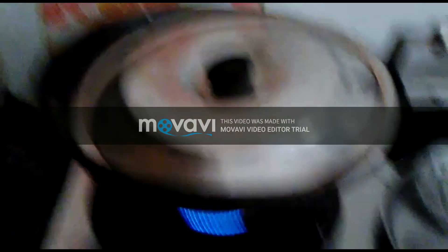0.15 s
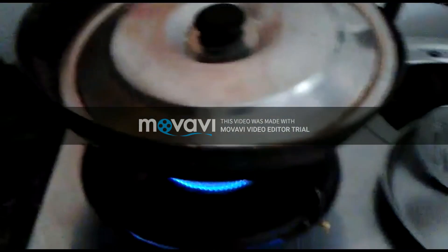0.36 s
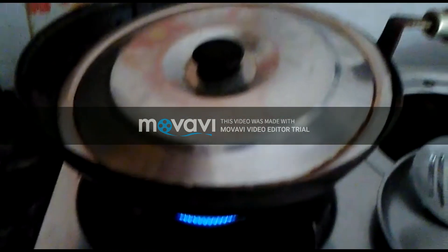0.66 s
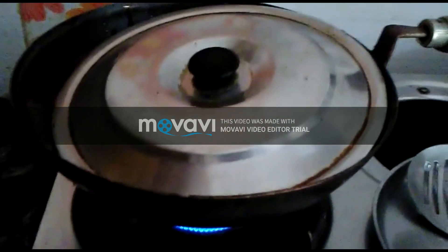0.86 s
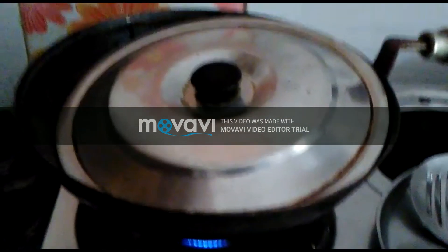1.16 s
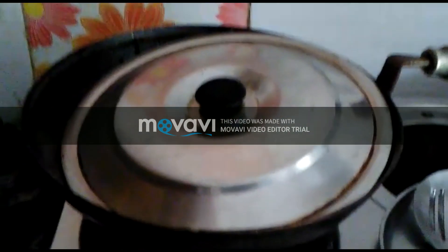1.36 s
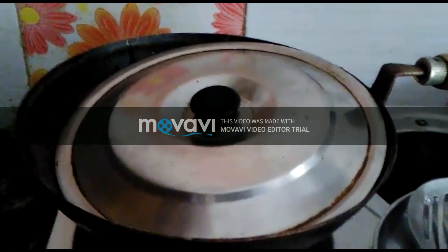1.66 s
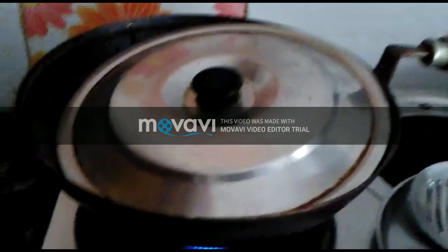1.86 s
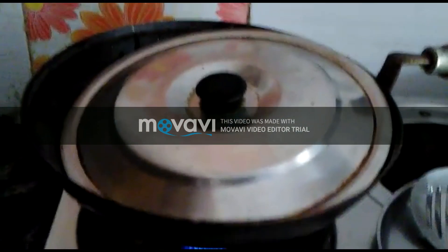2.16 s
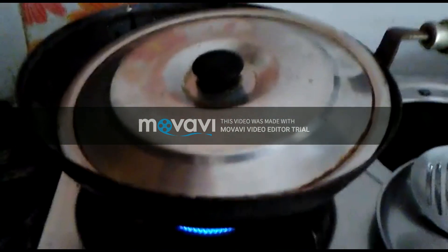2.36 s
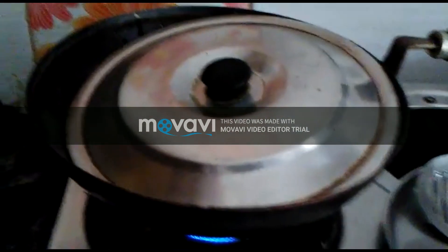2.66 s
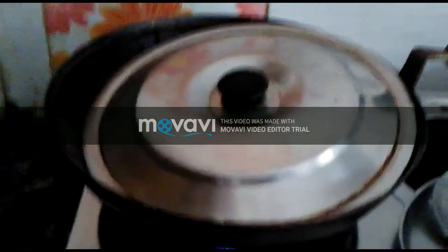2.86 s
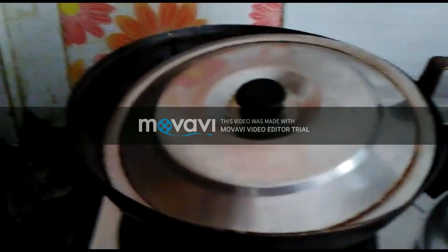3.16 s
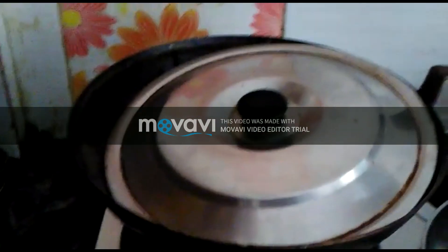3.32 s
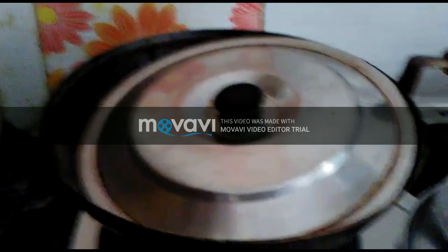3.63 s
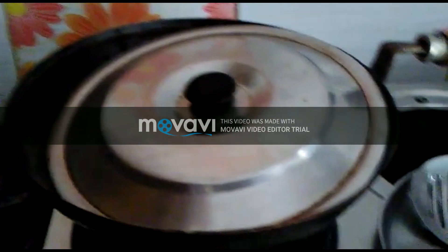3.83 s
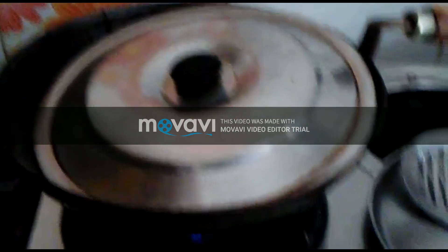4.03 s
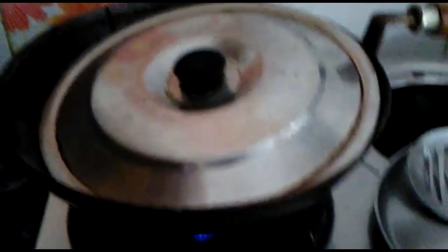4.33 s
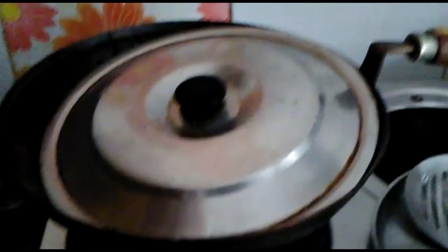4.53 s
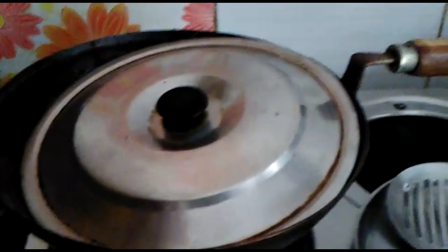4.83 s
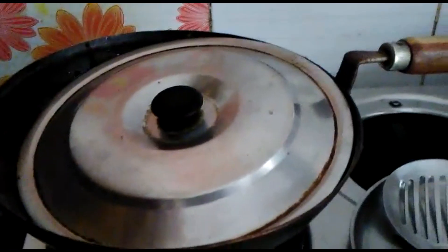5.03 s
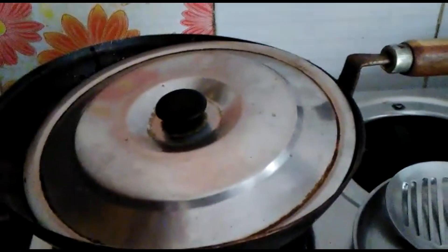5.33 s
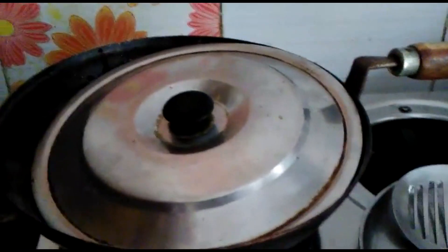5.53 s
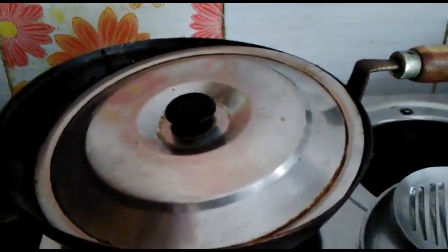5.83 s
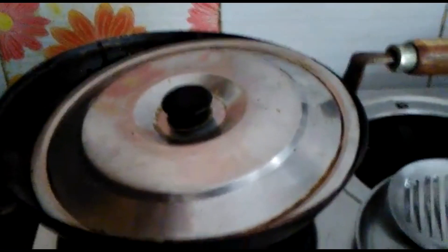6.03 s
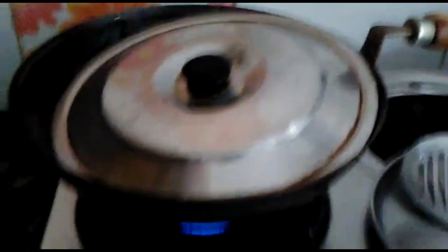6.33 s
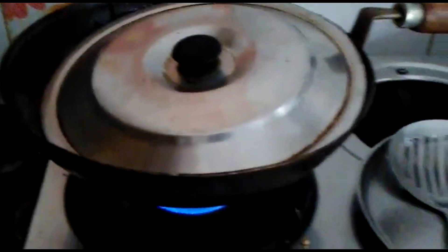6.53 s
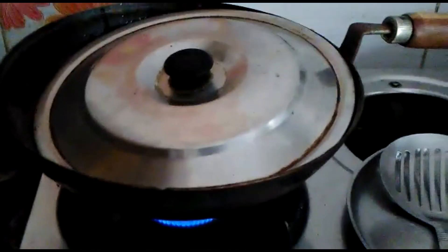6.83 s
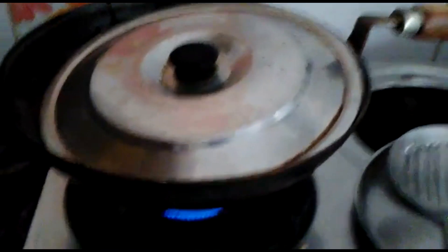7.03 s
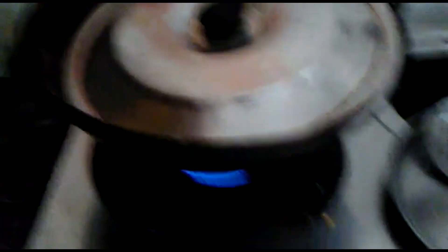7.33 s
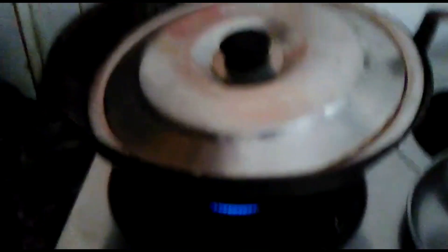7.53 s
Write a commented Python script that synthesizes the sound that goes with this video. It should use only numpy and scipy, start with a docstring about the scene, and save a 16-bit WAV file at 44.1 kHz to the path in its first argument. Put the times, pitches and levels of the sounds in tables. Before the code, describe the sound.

Close beside a covered pan on a kitchen gas stove, peas fry in oil. A soft, grainy simmer and airy high hiss continue throughout above a faint low flame rumble. Small spits tick with tiny metallic notes, mixed with brief fizzes. A mild pop opens the scene; faint short hums and light splashes appear around 0.7-0.8 seconds. At 1.48 and 1.57 two hard bursts thump and crack, the lid clanging at 1.61, with a weaker hollow knock at 1.87. Low hums flick by near 2.2 amid quieter spitting. The strongest, sharp burst hits around 3.58, after a small precursor; another rings at 4.75 with a quick double clang. At 5.78 a full thump and bright spit lead to two lid taps by 5.84. Hiss briefly swells after strong blows. From 6 to 7.7 only sizzling, fizzes and small spits remain. Treble is weaker on the left.

```python
"""At a gas stove, dried peas fry in oil under a thin steel lid. Steam bubbles spit: each is a short note that also
rings the pan. Now and then a pea bursts with a thump and a crack, and the lid lands on the rim with a clang; both
ring the modes of the lid, with noise around them. Short low hums, fizzes and splashes come between.
Behind them lie shaped noises: simmering and hissing oil, and the rumble of the gas flame.
The left microphone port is shaded and hears little treble."""
import sys
import numpy as np
from scipy import signal
from scipy.fft import rfft, irfft, next_fast_len
from scipy.io import wavfile
from scipy.ndimage import uniform_filter1d, map_coordinates

SR = 44100
rng = np.random.default_rng(int(sys.argv[2]) if len(sys.argv) > 2 else 0)


def wav_out(sig):
    """Save sig, one row per channel (or a flat mono array), as 16-bit PCM at SR to the path in sys.argv[1]."""
    wavfile.write(sys.argv[1], SR, np.round(np.clip(np.atleast_2d(sig).T, -1, 1) * 32767).astype(np.int16))


N = 338688

# bursting peas: t/s, blow level/dB, lows below the hinge/dB, brightness above it/(dB per octave),
# modes near the knock/dB
BURSTS = [(0.05, -35.5, -8.5, -2, -10), (1.482, -19.5, -4.5, 0, -7), (1.573, -13.5, -3, 0.43, 5),
          (1.866, -23.5, -3, -1.5, 10.5), (3.554, -25.5, 2.5, 2.9, 0), (3.585, -10.5, -4.5, 1, -2),
          (4.309, -49.5, -32, 3, -4), (4.754, -12, -2, 1.1, -3), (5.777, -15.5, 1.5, 0.1, -1),
          (7.243, -45, -26, -3.5, -7), (7.647, -50.5, -6, 0, 0.5)]
# ringing modes of the lid and the air under it: f/Hz, relative level/dB, time to fall 60 dB/s
LID_MODES = [(84, -14, 0.58), (106.2, 2.5, 0.46), (129.1, -5.5, .3), (250, -4, 0.14), (303.6, -9, 0.31),
             (328, -2, 0.21), (368.5, -5.5, 0.22), (440.7, -0.5, 0.21), (490, -2, 0.29), (637, -2, .2),
             (782, -4.5, 0.044), (832, -5, 0.18), (1200, -3, 0.18), (1380, -10.5, 0.12), (1550, -18, 0.18),
             (1792, -2, 0.29), (1922, -7.5, 0.42), (1978, -9, 0.48), (3120, -12.5, 0.059), (3490, -7, 0.16),
             (3600, -3, 0.2), (4190, -6.5, 0.18), (3920, -6.5, 0.33), (4750, -14, 0.29), (5280, -6, .2),
             (5500, -3, 0.22), (5520, -5, 0.16), (6210, -0.5, 0.13), (7160, -3.5, 0.07),
             (8650, -0.5, 0.069)]
# how alike left and right are: f/Hz, likeness (1 = the same, 0 = unrelated)
LIKENESS = [(60, 0.86), (140, 0.57), (320, 0.68), (750, 0.42), (1730, 0.02), (4010, 0.01), (9280, 0.1)]
KNOCK_HZ, CLANG_HZ = 800, 1850  # the colour point that is set anew for each burst, and for each landing


def bursting_peas():
    """A bursting pea thumps the lid, which rings mostly low and flexes back; the pea's skin cracks."""
    # shared colour of the bursts: f/Hz, level/dB before each burst's own tone
    burst_colour = [(105, 0), (298, 0), (480, -12), (KNOCK_HZ, -10), (1400, -18.5), (5600, -21)]
    # how fast the air puff of a burst dies away: f/Hz, time to fall 60 dB/s
    puff_fading = [(70, 0.47), (300, 0.33), (1000, 0.31), (2000, 0.38), (9000, .07)]
    hinge_hz, flex_hz, flex_delay_s = 299, 270, 0.0128
    crack_db, crack_t60_s = -24, 0.012  # the crack starts this far from the blow level, and dies this fast
    out, t = np.zeros((2, N + SR)), np.arange(SR // 30) / SR
    late = t - flex_delay_s
    flex = np.exp(-(late / 0.003) ** 2) * np.cos(2 * np.pi * flex_hz * late) * np.ones((2, 1))
    for s, db, *tone in BURSTS:
        colour = tinted(burst_colour, hinge_hz, KNOCK_HZ, *tone)
        thump = struck(LID_MODES[:14], colour, puff_fading, rise_s=0.0017, punch=1.1, spray_db=10.5, chatter=0.21)
        crack = amp(crack_db - 60 * t / crack_t60_s) * rng.standard_normal((2, len(t)))
        add(out, s, amp(db) * thump)
        add(out, s, -amp(db - 0.5) * flex)
        add(out, s, amp(db) * crack)
    return out[:, :N]


def landing_lid():
    """The lid lands on the rim and rings its higher modes."""
    # landings: t/s, blow level/dB, lows below the hinge/dB, brightness above it/(dB per octave),
    # modes near the clang/dB
    landings = [(1.611, -22, -9.5, -2.5, 5.5), (1.955, -57.5, -9, 14, 0), (3.6117, -34.5, -4, 3.5, 0),
                (4.782, -21.5, 4.5, 4, -3), (4.7992, -25, 5.5, -4.9, -0.5), (5.8196, -28, 5.5, -0.2, -0.5),
                (5.8441, -25, 2.5, -2.5, 1)]
    # shared colour of the landings: f/Hz, level/dB before each landing's own tone
    landing_colour = [(500, -63.5), (847, -2), (1200, -0.92), (CLANG_HZ, 0), (3740, -3), (5700, -9.5),
                      (9200, -12.5)]
    # how fast thrown oil and the room die away: f/Hz, time to fall 60 dB/s
    spray_fading = [(70, .4), (300, 0.86), (1000, 0.33), (4000, 0.37), (9000, 0.35)]
    hinge_hz = 1700
    out = np.zeros((2, N + SR))
    for s, db, *tone in landings:
        colour = tinted(landing_colour, hinge_hz, CLANG_HZ, *tone)
        clang = struck(LID_MODES[10:], colour, spray_fading, rise_s=0.0025, punch=0.1, spray_db=9.5, chatter=0.09)
        add(out, s, amp(db) * clang)
    return out[:, :N]


def struck(modes, colour, fading, rise_s, punch, spray_db, chatter):
    """Lid modes ring with the colour of the blow; noise crowds round them and dies band by band."""
    t = np.arange(SR * 2 // 3) / SR
    hz, db, t60 = np.transpose(modes)[:, :, None]
    chance = rng.standard_normal((2, len(modes), 1))
    level = amp(db + along(colour, hz) + 1.8 * chance[0] - 60 * t / t60)
    level *= 1 + punch * amp(-60 * t / 0.03)  # the lid is loudest at first, while it is off the rim

    # a loose lid blurs its high modes: their phases wander
    knots = rng.standard_normal((len(modes), 200)).cumsum(1)
    wander = np.array([np.interp(t, np.arange(200) * 0.004, k - k[0]) for k in knots])
    phase = 2 * np.pi * hz * t + chatter * np.sqrt(hz / 1000) * wander

    # the microphone ports disagree on short waves
    likeness = np.clip(along(LIKENESS, hz) ** 2 * 3.3, 0, 1)
    lead = np.arccos(likeness) / 2 * np.sign(chance[1])
    ring = np.array([-(level * np.sin(phase + side * lead)).sum(0) for side in (1, -1)])

    # noise with a hump of power round every lid mode
    f, frames, z = signal.stft(rng.standard_normal((2, len(t))), SR, nperseg=256, noverlap=192)
    humps = sum(amp(2 * d) / (1 + ((f - c) / (0.033 * c + 40)) ** 4) for c, d, _ in LID_MODES)
    crowd = np.sqrt(humps + 0.051)[:, None]
    decay_db = -60 * frames / along(fading, f)[:, None]
    z = paired(z, f) * crowd * amp(along(colour, f)[:, None] + spray_db + decay_db)
    spray = signal.istft(z, SR, nperseg=256, noverlap=192)[1][:, :len(t)]
    return (ring + spray) * (1 - np.exp(-t / rise_s))


def tinted(colour, hinge_hz, accent_hz, low_db, tilt_db, accent_db):
    """The shared colour of a kind of blow, with the lows, brightness and accent of one blow."""
    points = []
    for hz, db in colour:
        tone_db = low_db if hz < hinge_hz else tilt_db * np.log2(hz / hinge_hz)
        points.append((hz, db + tone_db + accent_db * (hz == accent_hz)))
    return points


def humming_lid():
    """Short low gliding hums, as of the lid rocking: driven unevenly, then ringing out."""
    # hums: t/s, driven length/s, start f/Hz, end f/Hz, relative level/dB
    hums = [(0.708, 0.098, 269, 241, -50), (0.725, 0.056, 490, 486, -40.5), (0.777, 0.062, 318, 348, -48),
            (2.199, 0.038, 431, 490, -36), (2.238, 0.034, 454, 446, -45.5)]
    out, t = np.zeros((2, N + SR)), np.arange(SR // 3) / SR
    for s, length, start_hz, end_hz, db in hums:
        pitch = np.interp(t, [0, length], [start_hz, end_hz])
        uneven = amp(3.6 * np.interp(t, np.arange(40) * 0.0105, rng.standard_normal(40)))
        ring_out = amp(-60 * np.maximum(t - length, 0) / 0.065)
        shape = uneven * (1 - np.exp(-t / 0.0021)) * ring_out
        add(out, s, amp(db) * shape * np.sin(2 * np.pi * np.cumsum(pitch) / SR) * np.ones((2, 1)))
    return out[:, :N]


def pan():
    """Close pairs of pan modes, struck by single spits and by a patter that follows the simmer; spits also sing."""
    # pan mode pairs: f/Hz, second f/Hz, time to fall 60 dB/s, left lead/rad,
    # relative patter level/dB, answer to a spit/dB
    mode_pairs = [(330.3, 372, 0.13, 0.35, -6.5, -3), (1397.7, 1445, 0.099, -1.5, -2, 0),
                  (2341, 2375, .14, -1.07, -4.5, -1), (3189, 3215, 0.11, -1.5, -11.5, -2.5),
                  (4074, 4010, 0.19, 5, -12, -12)]
    # single spits, each a bubble with a note that strikes the pan; the rows at the burst times are the bursting
    # peas striking the pan, with a short note where it rings most: t/s, note f/Hz, relative level/dB
    spits = [(0.0201, 1300, -32), (0.1344, 2680, -35.5), (0.3543, 2350, -36.5), (0.37, 1810, -41),
             (0.498, 1280, -28), (0.6845, 2350, -39), (0.833, 2390, -36.5), (0.942, 3600, -43),
             (1.1136, 2820, -39.5), (1.1883, 1690, -35), (1.4101, 1420, -32.5), (1.483, 2780, -30.5),
             (1.543, 3500, -43), (1.574, 2850, -31), (1.8682, 1390, -33.5), (2.092, 1140, -39.5),
             (2.169, 3200, -44.5), (2.2822, 2310, -40.5), (2.3144, 1420, -39.5), (2.5755, 2880, -37),
             (2.682, 2320, -40), (2.7703, 1414, -41), (2.8893, 2380, -36.5), (2.9226, 2370, -34.5),
             (2.991, 3140, -35.5), (3.043, 1900, -32), (3.094, 2380, -42.5), (3.2227, 1300, -33.5),
             (3.4311, 2070, -39.5), (3.5533, 1480, -28.5), (3.586, 1440, -26), (3.9853, 2400, -39.5),
             (4.16, 1700, -39.5), (4.171, 2300, -42), (4.312, 1264, -32), (4.4163, 1520, -40.5),
             (4.494, 1300, -38.5), (4.7549, 1420, -27.5), (4.916, 1300, -38), (5.483, 3200, -44),
             (5.589, 1700, -33.5), (5.6132, 1430, -39), (5.69, 2300, -40), (5.7798, 1447, -19),
             (6.2682, 2300, -43.5), (6.5049, 2380, -45), (6.6237, 2280, -41.5), (6.6661, 2300, -42.5),
             (6.785, 2330, -43), (6.799, 1430, -28), (6.9167, 1490, -37), (6.999, 2300, -37),
             (7.042, 1090, -39.5), (7.1038, 1580, -35), (7.3112, 2350, -37.5), (7.3571, 2200, -38),
             (7.5083, 1420, -37), (7.5756, 1335, -31), (7.651, 1395, -38.5)]
    detune_db_per_octave = 23.5  # a spit strikes hardest the pan pair nearest to its note
    patter_per_s, clump_s, clump_db = 160, 0.12, 4  # the patter comes and goes in clumps
    out, t = np.zeros((2, N + SR)), np.arange(SR // 4) / SR
    short = t[:SR // 16]
    busy = np.pad(flow(column=1), ((0, 0), (0, SR)))
    for hz, second_hz, t60, lead, patter_db, answer_db in mode_pairs:
        phase = np.array([[lead / 2], [-lead / 2]])
        tones = np.sin(2 * np.pi * hz * t + phase) + 0.86 * np.sin(2 * np.pi * second_hz * t + phase)
        ring = amp(-60 * t / t60) * tones * (1 - np.exp(-t / 0.0016))

        hits = rng.random(N + SR) < patter_per_s / SR
        patter = hits * amp(3.45 * rng.exponential(1, N + SR)) * rng.choice([-1, 1], N + SR)
        clumps = map_coordinates(rng.standard_normal(100), [np.arange(N + SR) / SR / clump_s])
        blows = amp(patter_db - 11 + clump_db * clumps) * busy * patter

        for s, note_hz, db in spits:  # a first blow, then a short sputter
            sputter = 0.03 * amp(-60 * short / 0.093) * rng.standard_normal(len(short))
            detune_db = detune_db_per_octave * abs(np.log2(note_hz / hz))
            add(blows, s, amp(db + answer_db - detune_db) * ((short == 0) + sputter)[None])
        out += signal.fftconvolve(blows, ring, axes=1)[:, :N + SR]

    for s, hz, db in spits:  # the bubble's own note: higher notes die sooner
        phase = 2 * np.pi * hz * short + rng.uniform(0, 2 * np.pi, (2, 1))
        fade = amp(db + 6 - 60 * short * hz / 35)
        add(out, s, fade * (1 - np.exp(-short / 0.0012)) * np.sin(phase))
    return out[:, :N]


def fizz():
    """A crowd of tiny bubbles boils up at once: grainy noise about an octave wide, fading."""
    # sudden fizzes: t/s, level before the fade/dB, centre f/Hz
    fizzes = [(0.048, -45.5, 3130), (.4, -40.5, 1400), (.83, -46.5, 2980), (.9, -51.5, 1070),
              (1.189, -44, 1700), (2.57, -47.5, 1280), (2.83, -48, 1400), (3.048, -53, 1740),
              (3.433, -47, 1150), (3.487, -42, 1380), (4.33, -48, 1280), (5.38, -48, 3300),
              (5.481, -51, 1550), (6.33, -53, 1100), (6.491, -47.5, 1580), (6.82, -46, 1220),
              (7.3, -56.5, 3040), (7.475, -49, 1820)]
    t60_s = 0.43
    out, t = np.zeros((2, N + SR)), np.arange(SR // 3) / SR
    hz = np.fft.rfftfreq(len(t), 1 / SR)
    for s, db, centre_hz in fizzes:
        grain_gain = amp(3.0 * np.repeat(rng.standard_normal(len(t) // 100), 100))
        grains = rng.standard_normal((2, len(t))) * grain_gain
        hump = np.exp(-(np.log((hz + 1) / centre_hz) / 0.5) ** 2)
        band = irfft(rfft(grains) * hump, len(t))
        add(out, s, amp(db - 60 * t / t60_s) * (1 - np.exp(-t / 0.003)) * unit(band))
    return out[:, :N]


def oil_and_flame():
    """Noise of simmering, hissing oil and a rumbling flame; hiss and rumble swell after each burst."""
    # colour of the simmer: f/Hz, relative level/dB
    simmer_colour = [(240, -39), (400, -13), (1100, -10), (1420, -0.5), (1890, -12.5), (2320, -3.5),
                     (2620, -10.5), (3150, -4.5), (4600, -22), (5980, -34), (10100, -120)]
    # colour of the hiss: f/Hz, relative level/dB
    hiss_colour = [(2400, -45), (3700, -16), (3950, 1.5), (4200, -11.5), (4870, -2.5), (5200, -1.5),
                   (5600, 6), (6400, 3), (7000, -5.5), (10000, -5.5)]
    # colour of the flame: f/Hz, relative level/dB
    flame_colour = [(18, -48.5), (30, 3), (107, 11), (150, -53.5), (316, 0), (377, -1.5), (409, -8.5),
                    (500, -7), (650, -47.5), (1100, -120)]
    # bright splashes of oil: t/s, relative level/dB
    splashes = [(0.6594, -30.5), (0.829, -33.5), (1.1872, -33), (2.1435, -33), (2.9278, -33), (3.1404, -34),
                (5.3474, -35), (5.484, -34), (5.694, -32.5), (7.427, -38)]
    stir_hiss_db, stir_rumble_db = -41, -46  # top of the swell after a 0 dB blow
    simmer = flow(column=1) * rush(simmer_colour, patchy_db=4.0, grain_db=2.0, grain_s=0.01)
    hiss_gain = flow(column=2, bursts=splashes) + stirred(stir_hiss_db)
    hiss = hiss_gain * rush(hiss_colour, patchy_db=2.0, grain_db=2.0, grain_s=0.006)
    rumble_gain = flow(column=3) + stirred(stir_rumble_db)
    rumble = rumble_gain * rush(flame_colour, patchy_db=3.5, grain_db=0.9, grain_s=0.012)
    return simmer + hiss + rumble


def flow(column, bursts=()):
    """Gain over time of the simmer, hiss or flame, with any sudden splashes that die away."""
    # steady levels of oil and flame: t/s, simmer level/dB, hiss level/dB, flame level/dB
    steady = [(0.0, -52.5, -48, -62.5), (1.1, -53, -46.5, -62.5), (1.41, -47, -50, -59),
              (2.4, -57, -49.5, -66.5), (3.47, -56, -50.5, -65), (4.11, -53, -46.5, -67),
              (4.72, -57.5, -50, -73), (5.2, -57, -49, -62), (5.67, -52.5, -47.5, -69),
              (6.2, -54, -45, -64), (7.68, -53, -47, -60)]
    splash_t60_s = 0.11
    s, db = np.transpose(steady)[[0, column]]
    gain = amp(np.interp(np.arange(N + SR) / SR, s, db))[None]
    t = np.arange(SR // 3) / SR
    for start, burst_db in bursts:  # noise peaks stand well above its mean level, hence the 8.5 dB
        add(gain, start, amp(burst_db - 8.5 - 60 * t / splash_t60_s)[None])
    return gain[:, :N]


def stirred(top_db):
    """Gain that swells and settles after each burst, as the oil is stirred up."""
    rise_s, grows = 0.1, 0.56  # time to the top of the swell; dB of swell per dB of blow
    start = np.array([[s] for s, *_ in BURSTS])
    u = np.maximum(np.arange(N) / SR - start, 0) / rise_s
    size = amp([[top_db + grows * db] for _, db, *_ in BURSTS])
    return (size * u ** 2 * np.exp(2 - 2 * u)).sum(0)


def rush(spectrum, patchy_db, grain_db, grain_s):
    """Stereo noise of rms 1: patches of random gain, and spiky swells from single bubbles."""
    spikes = uniform_filter1d(rng.exponential(1, N) ** 2.2, max(2, round(grain_s * SR)))
    grains = amp(grain_db * (spikes - spikes.mean()) / spikes.std())
    hz, _, z = signal.stft(grains * rng.standard_normal((2, N)), SR, nperseg=512)
    # random gains smoothed over frequency, then over time
    patches = uniform_filter1d(rng.standard_normal(z.shape[1:]), 10, 0)
    patches = unit(uniform_filter1d(patches, 8, 1))
    z = paired(z, hz) * amp(patchy_db * patches + along(spectrum, hz)[:, None])
    return unit(signal.istft(z, SR, nperseg=512)[1][:, :N])


def paired(z, hz):
    """Two unrelated spectra mixed into a left-right pair, most alike in the bass."""
    turn = np.arccos(np.clip(along(LIKENESS, hz), -1, 1))[:, None] / 2
    middle, side = np.cos(turn) * z[0], np.sin(turn) * z[1]
    return np.array([middle + side, middle - side])


def amp(db):
    """dB to gain."""
    return 10 ** (np.asarray(db) / 20)


def unit(x):
    """Scaled to rms 1."""
    return x / np.sqrt(np.mean(x ** 2) + 1e-20)


def along(points, hz):
    """Reads a value between (Hz, value) points on a log frequency axis."""
    f, v = np.transpose(points)
    return np.interp(np.log(hz + 1), np.log(f + 1), v)


def filtered(x, response):
    """x times a response of frequency."""
    m = next_fast_len(N + SR // 2)
    return irfft(rfft(x, m) * response(np.fft.rfftfreq(m, 1 / SR)), m)[..., :N]


def add(out, s, sound):
    """Mixes a sound into out, starting at s seconds."""
    start = round(s * SR)
    out[:, start:start + sound.shape[1]] += sound


def scene():
    """Bursting peas, the lid, the spitting pan, fizzes, oil and flame."""
    return bursting_peas() + landing_lid() + humming_lid() + pan() + fizz() + oil_and_flame()


def record(dry):
    """Bass cut and colour of the microphone, left port shaded from the treble, nothing above the band limit."""
    # shading of the left port: f/Hz, left minus right level/dB
    shade = [(60, -5), (88, -1), (130, -0.5), (190, 2), (280, -1.5), (420, -4), (610, 2), (910, -6.5),
             (1330, 0.5), (1970, 2.5), (2900, 0), (4270, -11.5), (6300, -21), (9280, -17.5)]
    # colour of the microphone: f/Hz, level/dB
    mic_colour = [(6800, 0), (7400, -7.5), (8000, -30.5), (8500, -17.5), (9300, -15.5), (9800, -24)]
    top_hz, bass_cut_hz = 9890, 78

    def ports(hz):
        """Frequency response of the left and right port."""
        left = amp(along(shade, hz))
        jw = 1j * hz / bass_cut_hz
        bass_cut = (jw ** 2 / (jw ** 2 + 1.41 * jw + 1)) ** 2
        balance = np.array([left, np.ones_like(left)]) * 2 / (1 + left)  # the two gains average 1
        return balance * amp(along(mic_colour, hz)) * bass_cut * (hz < top_hz)
    return filtered(dry, ports)


dry = scene()
out = record(dry)
wav_out(out)
```